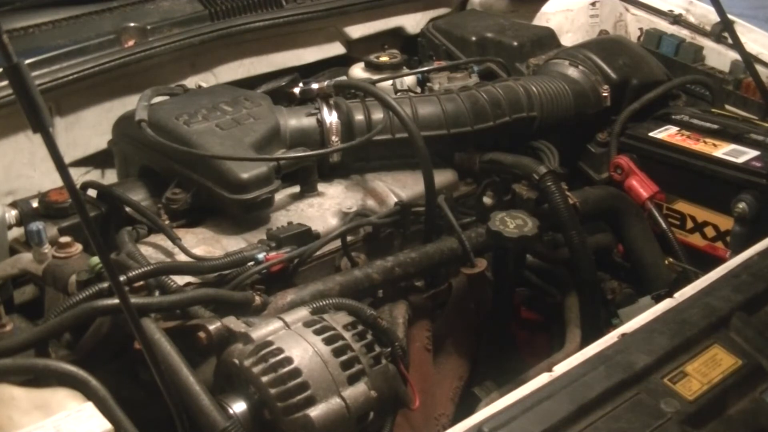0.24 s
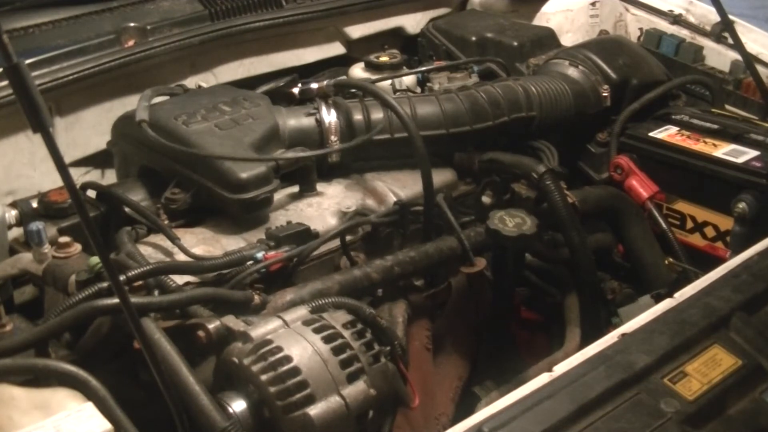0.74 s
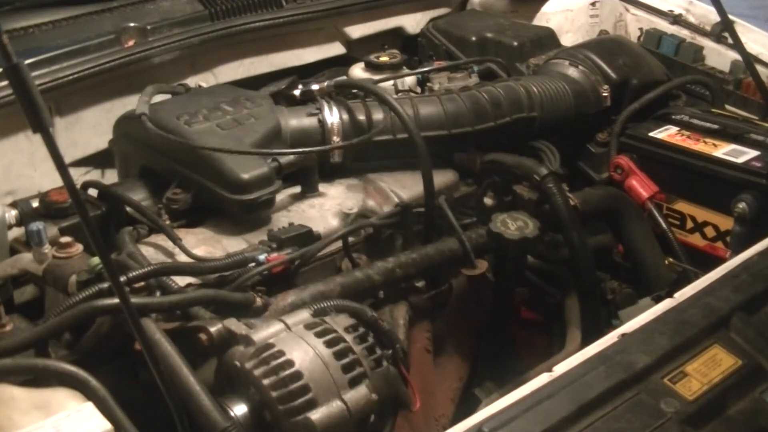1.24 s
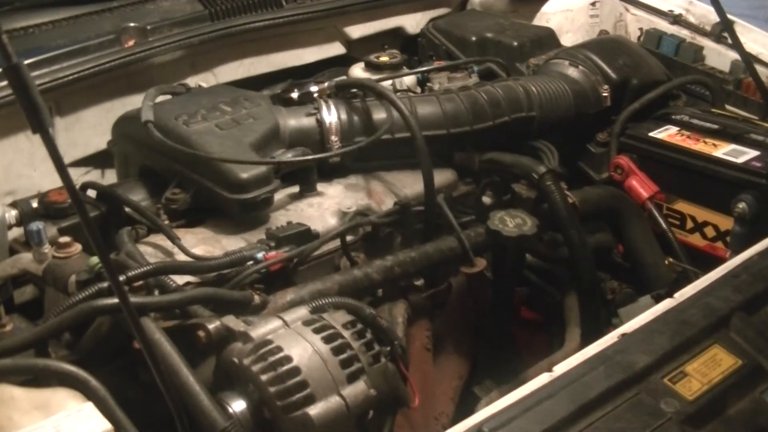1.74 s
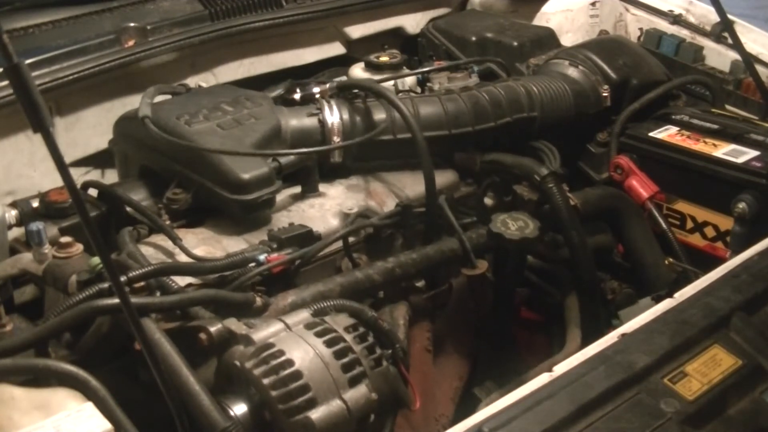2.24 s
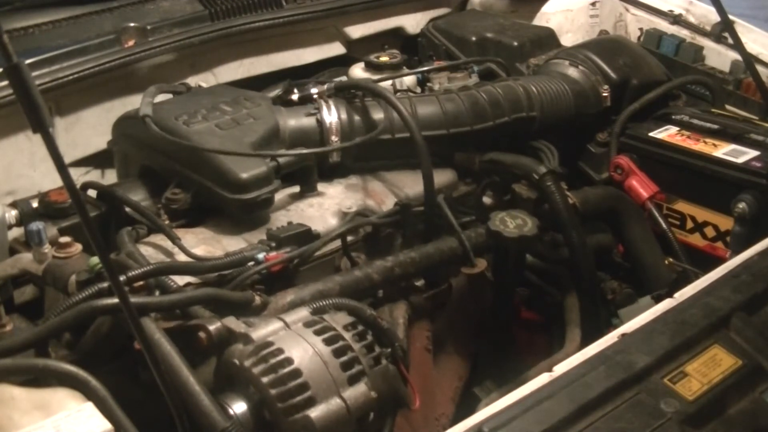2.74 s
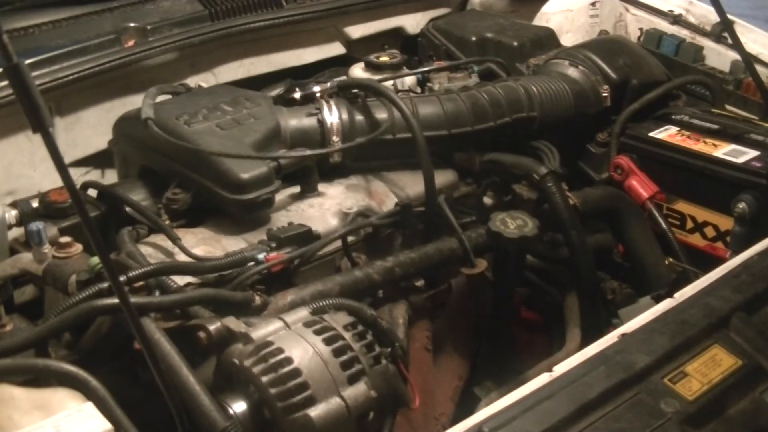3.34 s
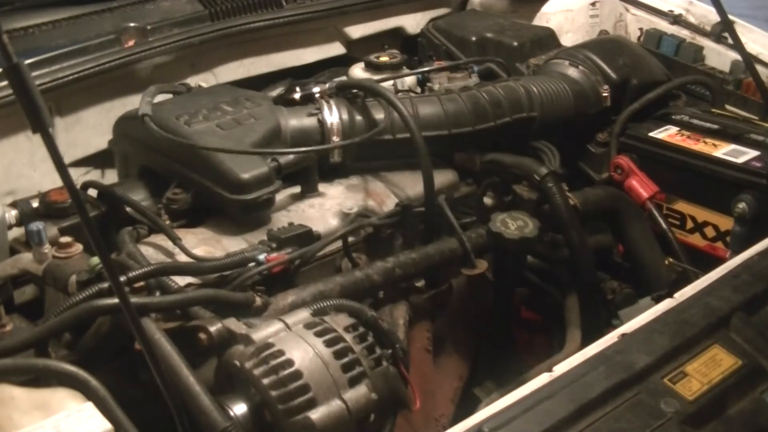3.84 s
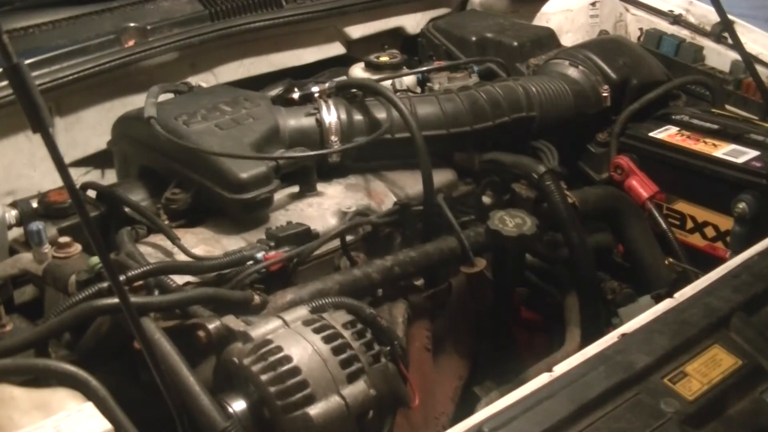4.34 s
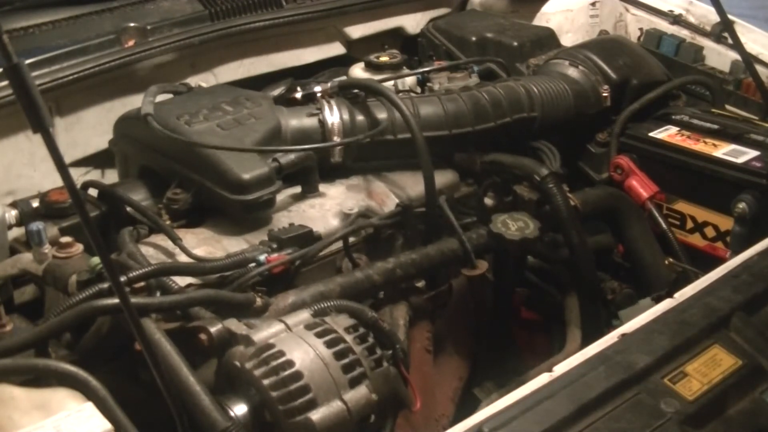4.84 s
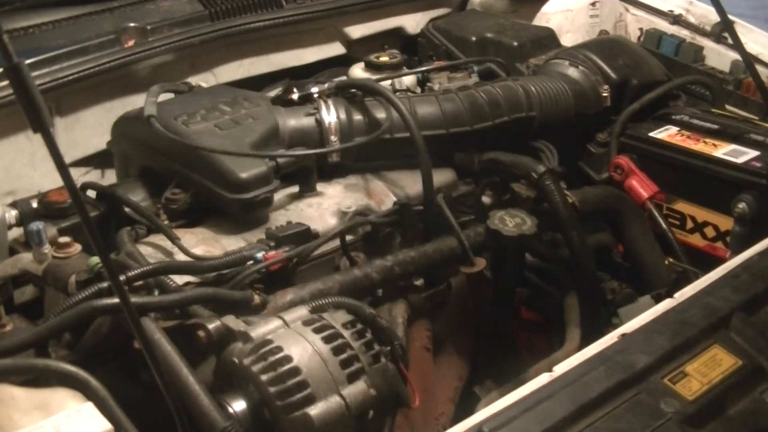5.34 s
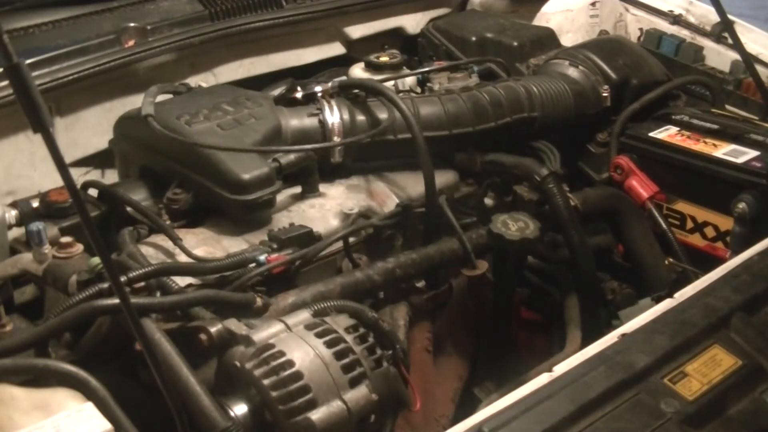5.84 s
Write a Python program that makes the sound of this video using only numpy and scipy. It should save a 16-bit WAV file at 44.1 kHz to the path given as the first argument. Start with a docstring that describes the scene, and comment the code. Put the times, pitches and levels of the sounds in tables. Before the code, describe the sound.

A car engine is cranked but does not start. A faint slide and hard metal clack lead into a labouring lurch, then steady rapid churning: gear teeth rattle, the block rings, thuds mark each compression and a bright hiss rises and dips. Low throb and quiet room noise sit beneath. Heard close to the open engine bay in a garage, mostly centred with some stereo width.

```python
"""A clack, then a grinding, ringing rattle: a starter motor cranks a four-cylinder car engine that never fires.
The solenoid throws the pinion in; gear teeth grind, made of tiny impacts that ring the block and its covers.
About nine times a second a piston passes compression: the gears clash, the engine thuds, and just after
that the hiss of the unloaded starter dips. Short squeals, a low throb and quiet room noise surround it."""
import sys
import numpy as np
from scipy import signal
from scipy.fft import rfft, irfft
from scipy.io import wavfile
from scipy.ndimage import uniform_filter1d

SR = 44100
rng = np.random.default_rng(int(sys.argv[2]) if len(sys.argv) > 2 else 0)


def bounce(signal):
    """Save signal as a 16-bit WAV file at the path given by the first command-line argument."""
    frames = np.transpose(np.atleast_2d(signal))
    limited = np.clip(frames, -1, 1)
    pcm = np.round(limited * 32767).astype(np.int16)
    wavfile.write(sys.argv[1], SR, pcm)


N = 268569
TIME = np.arange(N) / SR  # seconds
FREQ = np.maximum(np.arange(8193) * SR / 16384, 1)  # Hz, kept above zero for the logarithm
START_S = 0.136  # the crank begins to turn

# How one compression stroke, from clash to clash, shades the layers.
# Each row: share of the stroke [0-1], then offsets of gears, hiss and drone [dB each].
CYCLE = [(0, -2, 0, 6.5), (.15, 0.55, 1.5, 8.5), (.28, -0.5, -2.5, 3.5), (.45, -0.7, -1.5, 5.5),
         (.55, -0.9, 3.5, 5.5), (.65, 0.2, 2.5, 0), (.75, -1, 2.7, 2), (1, 0.25, 1.5, 5)]


def undb(db):
    """Decibels to gain."""
    return 10 ** (np.asarray(db) / 20)


def curve(table, at=TIME):
    """The columns of a table after the first, joined by straight lines."""
    key, *columns = np.transpose(table)
    return [np.interp(at, key, column) for column in columns]


def spectrum(points):
    """Gain over frequency from (Hz, dB) points, straight in dB over log frequency."""
    hz, db = np.transpose(points)
    return undb(np.interp(np.log(FREQ), np.log(hz), db))


def unit(response):
    """Scale an impulse response so that white noise keeps its level."""
    return response / np.sqrt(np.sum(response ** 2))


def causal(gain):
    """Minimum-phase impulse response of a gain curve, by folding its cepstrum."""
    cepstrum = irfft(np.log(gain + 1e-6))
    half = len(cepstrum) // 2
    folded = np.r_[cepstrum[0], 2 * cepstrum[1:half], np.zeros(half)]
    return irfft(np.exp(rfft(folded)))


def play(x, response):
    """Pass one or several sounds through the first quarter second of an impulse response."""
    return signal.oaconvolve(np.atleast_2d(x), response[None, :SR // 4], axes=1)[:, :N]


def block(force, lo_hz, hi_hz, order=10):
    """A force with its energy between two edges rings the modes of block, covers and bay."""
    # Each row: mode frequency in Hz, width in Hz, height in dB over the broad response.
    block_modes = [(221, 8, 16), (259, 17, 16), (324, 44, 10), (445, 8, 8), (516, 8, 5), (618, 45, 3),
                   (846, 12, 10), (918, 39, 7), (1089, 12, 12), (1111, 20, 10), (1306, 37, 8),
                   (1408, 22, 7), (1508, 38, 1), (1572, 9, 5), (1845, 8, 4), (1902, 45, 3), (2004, 25, 5),
                   (2160, 14, 6), (2279, 16, 7), (2380, 45, 1), (2995, 41, 1), (3047, 8, 4), (3281, 8, 2),
                   (3360, 8, 1), (3821, 14, 3), (3995, 19, 2), (4160, 45, 2), (4598, 33, 2), (5752, 12, 6),
                   (6038, 12, 2)]
    # Broad response of the engine. Each row: frequency in Hz, level in dB.
    broad_response = [(150, -25), (300, -25.5), (500, -9.5), (750, -5), (1190, -8.5), (1600, -3.5),
                      (2700, -4), (3400, -1.5), (4400, -4.5), (5200, -9), (8800, -14), (10000, -19),
                      (11400, -18.5), (15500, -29.5)]
    modes = 1 + sum(undb(db) ** 2 / (1 + (2 * (FREQ - hz) / width) ** 2) for hz, width, db in block_modes)
    band = 1 / ((1 + (lo_hz / FREQ) ** order) * (1 + (FREQ / hi_hz) ** order))
    gain = np.sqrt(modes * band) * spectrum(broad_response)
    return play(force, unit(causal(gain)))


def grit(rate, scatter_db, smooth, size=N):
    """Metal on metal: tiny uneven impacts (rate per second) over sliding noise; rows for middle and flanks."""
    slide = rng.standard_normal((2, size))
    struck = rng.random((2, size)) < rate / SR
    hits = np.zeros((2, size))
    # the time-reversed noise scatters the strength of the impacts
    hits[struck] = np.sign(slide[struck]) * undb(scatter_db * slide[:, ::-1][struck])
    force = hits / np.std(hits) + smooth * slide
    return force / np.std(force)


def wander(force, patchy_db, hold_s, spread_hz, size=512):
    """The contact point moves, so neighbouring modes are driven now harder, now softer."""
    _, _, cells = signal.stft(force, nperseg=size)
    field = rng.standard_normal(cells.shape[1:])
    # blur the random field over frequency, then over time
    for axis, reach in enumerate((spread_hz * size / SR, hold_s * SR / (size / 2))):
        bell = np.expand_dims(signal.windows.gaussian(size // 8 + 1, reach / 2), 1 - axis)
        field = signal.fftconvolve(field, bell, mode="same")
    gain = undb(patchy_db * field / np.std(field))
    gain = gain / np.sqrt(np.mean(gain ** 2))
    return signal.istft(cells * gain, nperseg=size)[1][:, :N]


def bursts(times, levels_db, rise_s, hold_s, decay_s):
    """Envelope of blows that rise, chatter for a moment and die away."""
    envelope = np.zeros(N)
    for s, db in zip(times, levels_db):
        span = slice(int(s * SR), int(s * SR) + SR // 4)
        age = np.maximum(TIME[span] - s, 0)
        rise = 1 - np.exp(-age / rise_s)
        decay = np.exp(-np.maximum(age - hold_s, 0) / decay_s)
        envelope[span] += undb(db) * rise * decay
    return envelope


def stroke_count():
    """Crank position, counted in compression strokes: the running sum of the cranking speed."""
    # Each row: start in seconds, compression strokes per second, held until the next row.
    cranking_speed = [(.14, 8.696), (.255, 7.47), (.389, 9.22), (.606, 9.415), (.925, 8.533),
                      (1.393, 9.275), (2.148, 9.25), (3.445, 9.174), (4.426, 9.055)]
    since, rate = np.transpose(cranking_speed)
    return np.cumsum(np.r_[0, rate][np.searchsorted(since, TIME)]) / SR


def runout(strokes, peak_turn):
    """Off-centre ring gear: a swing between -1 and 1, once per turn of the crank (two strokes)."""
    return np.cos(2 * np.pi * (strokes / 2 - peak_turn))


def ambient_noise():
    """Quiet steady background: white noise shaped by a smooth spectrum."""
    # Each row: frequency in Hz, relative density in dB per Hz.
    ambient_tone = [(25, -15), (55, -8.5), (110, -7), (300, -1.5), (900, 1.5), (2000, -6), (4000, -18.5),
                    (10000, -26), (15000, -40)]
    return undb(-36.0) * play(rng.standard_normal((2, N)), unit(causal(spectrum(ambient_tone))))


def solenoid(size=SR):
    """The plunger slides, slams home, the pinion strikes the ring gear and jerks the crank round."""
    # The solenoid engages and the engine lurches into motion.
    # Each row: start in seconds, level in dB, decay in seconds, lower edge in Hz, upper edge in Hz.
    engage_blows = [(0.137, -16, 0.024, 7050, 16100), (0.139, -17.5, .015, 1400, 6460),
                    (.153, -13, 0.012, 695, 5000), (.25, -41, 0.038, 35, 151),
                    (0.256, -25, 0.017, 280, 530), (.415, -28, 0.011, 278, 483)]
    slide = block(grit(3300, 3, 1, size) * bursts([.086], [-44], 0.0083, .05, .01)[:size], 2500, 16000)
    pull = block(grit(1000, 3.4, 0.92, size) * bursts([.068], [-37], 0.0027, 0.04, 0.058)[:size], 250, 1250)
    sound = slide + pull
    for s, db, decay_s, lo_hz, hi_hz in engage_blows:
        envelope = bursts([s], [db], 0.00077, 0.0094, decay_s)[:size]
        sound = sound + block(grit(2100, 1.7, 0.71, size) * envelope, lo_hz, hi_hz)
    return np.pad(sound, [(0, 0), (0, N - sound.shape[1])])


def starter(strokes, running):
    """The pinion grinds over the ring gear, a dense rattle that follows the load of each stroke and turn."""
    # Gear train, straining at first, then easing. Each row: time in seconds, grinding in dB,
    # ring of the flywheel plate and tooth scrape, both in dB relative to the grinding before swing and trim.
    gear_levels = [(.16, -21, -8, -2), (.19, -18.5, -15, -3), (.26, -16.5, -3, -5.5), (.31, -18.5, -10, 7),
                   (.34, -23.5, -9, 9.5), (.39, -17.5, -2, -2.5), (.45, -17, -12, -1.5),
                   (.54, -17, -9.5, -0.5), (.85, -18.5, -5.5, 1.5), (2.1, -19, -6.5, 0),
                   (2.6, -20.5, -6, 1), (3.35, -19, -8, -0.5), (4.7, -20.5, -4.5, 1),
                   (5.55, -19.5, -7.5, -1), (6.09, -18.5, -7, -0.5)]
    # Friction hiss of the loaded starter. Each row: time in seconds, level in dB before the stroke offset.
    hiss_levels = [(.14, -14), (.2, -27.5), (.33, -27.5), (.41, -30.5), (.46, -24), (2, -25), (6.09, -25.5)]
    # Drone of the turning engine. Each row: time in seconds, level in dB before the stroke offset.
    drone_levels = [(.14, -30.5), (.26, -41), (.35, -38), (.43, -30.5), (.5, -36), (1.1, -33),
                    (1.22, -32.5), (1.5, -36), (3, -35.5), (6.09, -36.5)]
    grind_db, plate_db, scrape_db = curve(gear_levels)
    # the mesh changes over a turn: swing in dB, with the peak at a share of the turn
    plate_db = plate_db + 1.5 * runout(strokes, peak_turn=0.69)
    scrape_db = scrape_db + 1.0 * runout(strokes, peak_turn=.17)
    load_db, hiss_load_db, drone_load_db = curve(CYCLE, strokes % 1)
    drive = running * undb(grind_db + load_db)

    grind = wander(grit(1500, 1.5, 1.0), 2.16, 0.046, 71) * drive
    plate = wander(grit(900, 3.8, 0.88), 2.0, 0.086, 100) * drive * undb(plate_db - 1.0)
    scrape = wander(grit(2000, 2.7, 1.0), 3.16, 0.069, 75) * drive * undb(scrape_db - 0.3)
    gears = block(grind, 1160, 2760) + block(plate, 860, 1144) + block(scrape, 2630, 5550)

    hiss = wander(grit(3000, 2.2, 1.0), 2.4, 0.031, 100) * running * undb(curve(hiss_levels)[0] + hiss_load_db)
    drone = grit(600, 1, 0.8) * running * undb(curve(drone_levels)[0] + drone_load_db)
    return gears + block(hiss, 5040, 12900) + block(drone, 196, 829, order=18)


def pumping(strokes, running):
    """Pistons push air to and fro: a faint throb, and a low rumble that swells after each compression."""
    # Each row: multiple of the stroke rate, level in dB.
    throb_partials = [(3, -62), (6, -68), (10, -65), (13, -67)]
    throb = 0
    for multiple, db in throb_partials:
        turns = round(multiple) * strokes + rng.random()
        throb = throb + undb(db) * np.sqrt(2) * np.sin(2 * np.pi * turns)
    swell_db = curve(CYCLE, strokes % 1)[2]
    rumble = block(rng.standard_normal((2, N)) * undb(swell_db - 55), 103, 290)
    return running * (throb + rumble)


def squeals(waver_hz=14):
    """The teeth chatter in step with one mode and it sings out: short swelling tones of unsteady pitch."""
    # Each row: time of the height in seconds, pitch in Hz, level at the height in dB, length in seconds.
    squeal_tones = [(0.159, 928, -16, 0.026), (0.209, 936, -22.5, 0.081), (0.244, 2540, -26, 0.07),
                    (0.283, 924, -21.5, 0.072), (0.334, 3400, -19.5, .08), (0.353, 4050, -21, 0.078),
                    (0.381, 900, -25, .035), (0.418, 926, -20.5, 0.058), (0.44, 2000, -17, 0.033),
                    (0.53, 1092, -22, 0.076), (1.14, 2200, -24, 0.097), (1.638, 1090, -27, .07),
                    (2.076, 1087, -23, .08), (2.289, 1090, -26.5, .1), (2.586, 3500, -19, 0.042),
                    (3.235, 3400, -20, .04), (3.348, 1055, -22, .045), (3.374, 925, -25.5, 0.16),
                    (3.8, 1088, -30, .12), (4.77, 3500, -23, 0.034)]
    out = np.zeros(N)
    for s, hz, db, length in squeal_tones:
        waver = uniform_filter1d(rng.standard_normal(SR), SR // 100)
        near = np.flatnonzero(np.abs(TIME - s) < length / 2)
        turns = np.cumsum(hz + waver_hz * waver[:len(near)] / np.std(waver)) / SR
        swell = np.cos(np.pi * (TIME[near] - s) / length)
        out[near] += undb(db) * np.sqrt(2) * swell * np.sin(2 * np.pi * turns)
    return out


def compressions(strokes):
    """Past top dead centre the flywheel overtakes the pinion: backlash clashes and the engine rocks."""
    # Weight of the thud at each compression. Each row: time in seconds, base level in dB.
    thud_weight = [(.25, -25.5), (1.2, -30.5), (1.5, -34), (1.85, -27), (3.1, -26), (3.6, -29), (4.5, -32),
                   (5.3, -27), (6, -25)]
    # Two compressions knock harder. Each row: time in seconds, extra thud in dB.
    hard_knocks = [(2.364, 1), (5.31, 6)]
    # The engine rocks after each stroke. Each row: delay in seconds, level in dB, upper edge in Hz.
    rocking_blows = [(0, -2.5, 330), (.003, 6, 720), (.015, -3.5, 340), (.043, -5.5, 330)]
    s = TIME[1:][np.diff(np.floor(strokes)) > 0]
    late, clash_luck, edge_luck, thud_luck = rng.standard_normal((len(s), 4)).T
    s = s + .001 * late  # timing jitter in seconds
    slow = s < .45  # until then the flywheel is too slow to clash hard
    clash_db = -14.5 - 4 * slow + 0.8 * clash_luck
    edge_db = -21 - 16 * slow + 2 * edge_luck  # bright edge of the clash
    thud_db = curve(thud_weight, s)[0] + 0.7 * thud_luck
    for at, extra_db in hard_knocks:
        thud_db[np.argmin(np.abs(s - at))] += extra_db

    clash = block(grit(1800, 2.3, 1.0) * bursts(s, clash_db, 0.0021, 0.0089, 0.0076), 1140, 5440)
    edge = block(grit(2000, 2.3, 0.93) * bursts(s, edge_db, 0.0013, 0.0081, 0.0077), 5870, 20000)
    # each thud is one firm blow with a little rattle behind it
    blows = grit(1500, 2.4, 0.28) * bursts(s, thud_db - 4.5, 0.0012, 0.005, 0.0033)
    blows[:, (s * SR).astype(int).clip(0, N - 1)] += undb(thud_db + 16.5)
    thuds = 0
    for delay_s, db, hi_hz in rocking_blows:
        delayed = np.roll(blows, int(delay_s * SR), axis=1) * (TIME > START_S)
        thuds = thuds + undb(db) * block(delayed, 196, hi_hz, order=16)
    return clash + edge + thuds


def reflections(delay_s, t60_s):
    """Dense echoes that begin after a delay and fade by 60 dB in t60_s."""
    age = TIME[:SR // 2] - delay_s
    fade = np.exp(-np.log(1000) * np.abs(age) / t60_s)
    return unit(rng.standard_normal(len(age)) * (age > 0) * fade)


def scene():
    """The engine under its raised bonnet, in a garage."""
    # Sound from the flanks of the bay, unlike left and right. Each row: frequency in Hz, side minus mid in dB.
    side_width = [(30, -8), (250, -20.5), (600, -16.5), (1200, -18), (2000, -14), (4000, -9.5), (8000, -5),
                  (15000, -4)]
    strokes = stroke_count()
    running = np.clip((TIME - START_S) / 0.029, 0, 1)  # fades in as the crank starts
    engine = ambient_noise() + solenoid() + starter(strokes, running)
    engine = engine + pumping(strokes, running) + squeals() + compressions(strokes)
    mid, flanks = engine + undb(-15.5) * play(engine, reflections(delay_s=0.003, t60_s=0.42))
    # the bass comes from the whole block, the treble from many places around the bay
    side = play(flanks, causal(spectrum(side_width)))[0]
    balance_db = -1.3  # left relative to right
    left = (mid + side) * undb(balance_db / 2)
    right = (mid - side) * undb(-balance_db / 2)
    return np.array([left, right])


def record(dry):
    """Round the highest peaks softly and cut the treble steeply above 15750 Hz."""
    rounded = np.tanh(0.61 * dry) / 0.61
    return signal.sosfilt(signal.ellip(10, .2, 80, 15750, fs=SR, output="sos"), rounded)


dry = scene()
out = record(dry)
bounce(out)
```